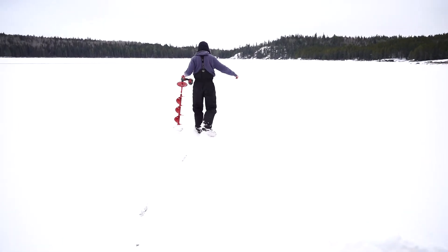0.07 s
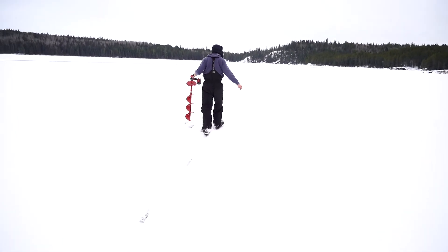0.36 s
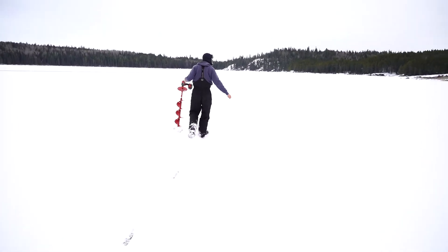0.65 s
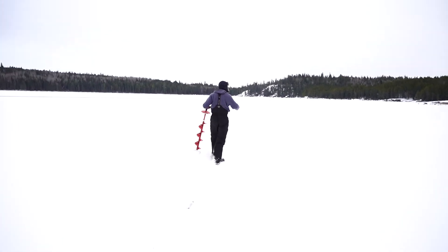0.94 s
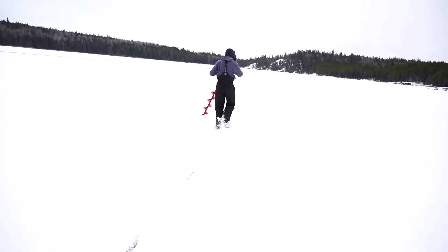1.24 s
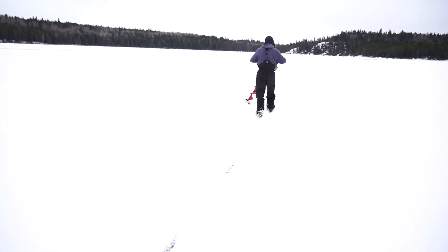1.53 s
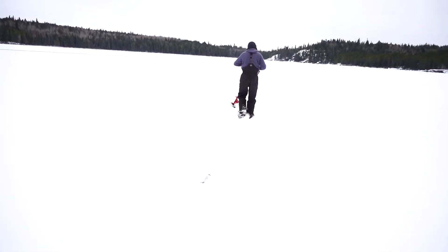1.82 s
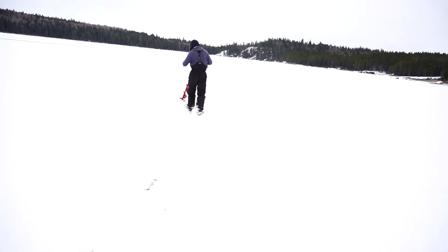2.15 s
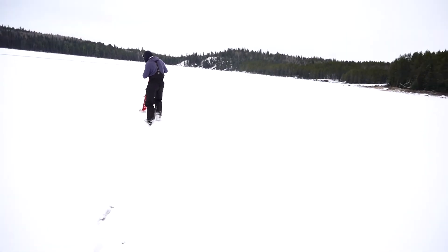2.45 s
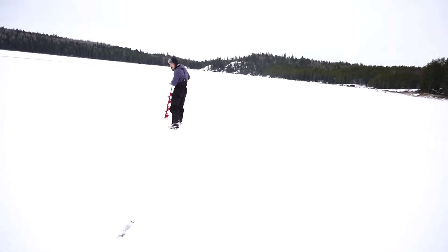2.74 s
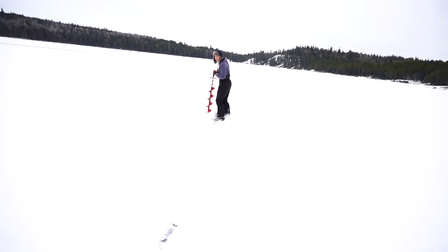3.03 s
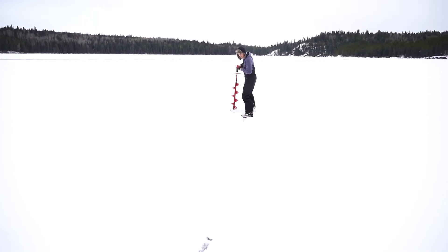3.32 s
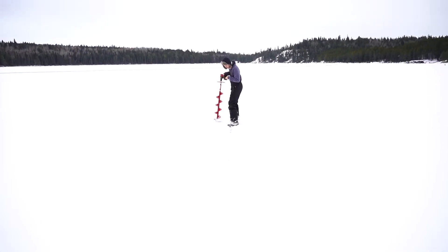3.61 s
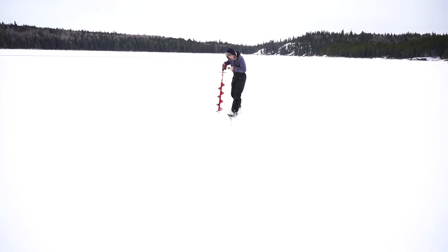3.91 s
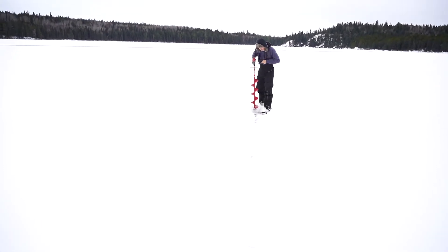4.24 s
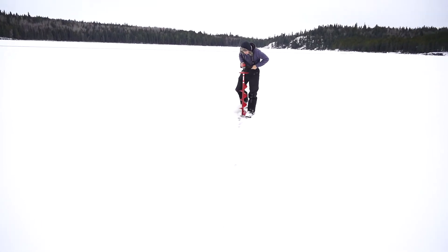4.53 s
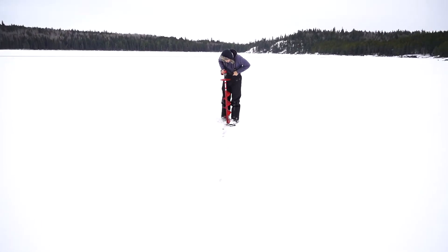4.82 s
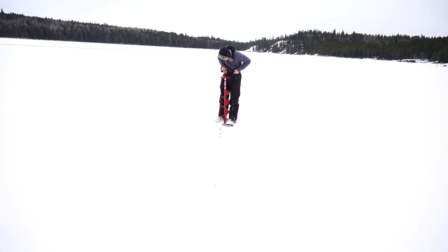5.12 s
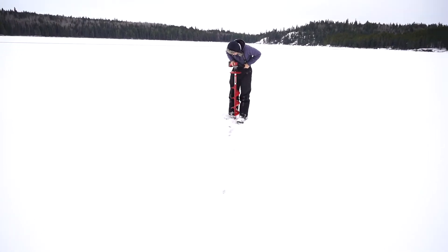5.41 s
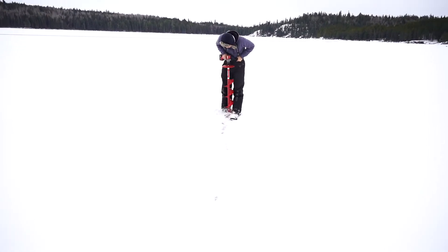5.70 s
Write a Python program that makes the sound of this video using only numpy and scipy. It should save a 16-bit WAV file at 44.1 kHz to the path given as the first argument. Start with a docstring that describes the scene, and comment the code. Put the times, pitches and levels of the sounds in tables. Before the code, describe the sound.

Wind rumbles and thumps unevenly on a hand-held microphone out on an open frozen lake. Under it, winter clothing rustles and swishes, and handled gear gives a few light knocks and clicks. After about five seconds a cordless drill spins up with a thin whistle and a rising gear whine, and its steel auger scrapes and crunches into the ice, harder with each cut. There is no echo.

```python
"""Drilling a frozen lake in the wind

Wind rocks and buffets a hand-held microphone while winter clothing swishes by friction and gear knocks.
Then a cordless drill spins up with a thin switching whistle and the whine of meshing gears.
The blades of its steel auger fracture the ice, scraping harder with each cut."""
import sys
import numpy as np
from scipy import signal
from scipy.fft import rfft, irfft
from scipy.io import wavfile

SR = 44100
rng = np.random.default_rng(int(sys.argv[2]) if len(sys.argv) > 2 else 0)


def dump(signal):
    """Clip the signal to [-1, 1] and save it as 16-bit WAV at the path in sys.argv[1]."""
    limited = np.clip(np.atleast_2d(signal).T, -1, 1)
    pcm = np.round(limited * 32767).astype(np.int16)
    wavfile.write(sys.argv[1], SR, pcm)


N = 262836
TIME = np.arange(N) / SR
FREQ = np.maximum(np.arange(N // 2 + 1) * SR / N, 1)
FULL_DRIVE_HZ = 650  # electrical rate of the motor at full drive

# the trigger, squeezed lightly and then hard: time_s, unloaded_electrical_rate_hz
TRIGGER_SQUEEZE = [(5.122, 1), (5.2, 175), (5.28, 180), (5.39, 335), (5.51, 500), (5.56, 552), (5.87, 610)]
# deep cuts of the blades: peak_s, length_s, level_db, centre_hz, motor_sag_hz
BLADE_CUTS = [(5.416, 0.044, -19.5, 3400, 0), (5.603, 0.064, -17, 1410, 49.5),
              (5.726, 0.023, -15, 1420, 86.5), (5.785, 0.042, -13, 1780, 50.5),
              (5.932, 0.077, -15.5, 1630, 60.5)]


def drill(switching_hz=8000, whistle_db=-39, carrier_db=-9, slot_db=-41, whine_db=-20, rattle_db=-29,
          throb_db=4.5, throb_period_s=0.16, throb_peak_s=5.56):
    """Modulation splits the switching whistle into sidebands; gear teeth whine and rattle the housing."""
    # gear mesh tones: multiple_of_electrical_rate, level_db
    gear_orders = [(3, -12), (5, 0), (6.35, -6)]
    throttle = drive()
    phase = 2 * np.pi * np.cumsum(motor_hz() * (1 + 0.002 * drift(70))) / SR
    ripple = np.sqrt(np.sin(np.pi * throttle))  # strongest at half drive
    whistle = np.sin(2 * np.pi * switching_hz * TIME) * (2 * np.cos(2 * phase) + undb(carrier_db))
    # magnets passing the stator slots buzz as they sweep through a resonance of the case
    buzz = resonate(np.sin(20 * phase) * drift(120), hz=3500, width_hz=400)
    # the whine throbs with the turning auger
    throb = undb(throb_db * np.cos(2 * np.pi * (TIME - throb_peak_s) / throb_period_s) + drift(50))
    whine = sum(undb(db) * np.sin(order * phase) for order, db in gear_orders)
    housing = resonate(grains(1500, 1.5), hz=2900, width_hz=320)
    rattle = unit_rms(resonate(housing, hz=2900, width_hz=960))
    motor = undb(whistle_db) * whistle * ripple + undb(slot_db) * buzz
    gears = undb(whine_db) * whine * throb * throttle ** 2.5 + undb(rattle_db) * rattle * throttle ** 0.55
    return running() * (motor + gears)


def auger(scrape_db=-18, ring_db=-21.5, chips_db=-21, grip_drive=0.59, crunch_width_hz=1500):
    """Brittle fracture of ice under chattering blades excites the steel's modes and throws off chips."""
    # spectrum of the scrape: frequency_hz, level_db
    scrape_spectrum = [(200, -8.5), (300, -7), (440, -4), (600, -6.5), (830, -6), (1000, -0.5),
                       (1400, -4.5), (2200, -6), (3000, -3), (3700, -6.5), (4400, -6), (6000, -21)]
    # modes of the steel flights: pitch_hz, width_hz, level_db
    steel_modes = [(438, 95, 0), (795, 33, 0), (870, 73, -5), (1330, 125, 1), (1687, 52, -0.5),
                   (1806, 20, -3), (2136, 62, -3), (2300, 170, -3.5), (3870, 210, -13)]
    # spectrum of the hissing chips: frequency_hz, level_db
    chip_spectrum = [(3500, -10), (5000, -3), (6200, -6), (7800, -0.5), (8500, -2), (9400, -14),
                     (12500, -12), (15500, -23)]
    depth = (drive() / grip_drive) ** 2.88
    bite = depth / np.hypot(1, depth)  # grows steeply until the blades grip, then levels off
    spray = drive() ** 1.94  # keeps growing with speed
    chatter = undb(drift(51))
    fractures = colour(grains(6000, 1.3) * chatter, scrape_spectrum)
    ring = sum(undb(db) * resonate(grains(3000, 0.93) * chatter, hz, width_hz)
               for hz, width_hz, db in steel_modes)
    scrape = undb(scrape_db) * fractures + undb(ring_db) * unit_rms(ring)
    chips = undb(chips_db) * colour(grains(12000, 0.9) * chatter, chip_spectrum)
    out = running() * (scrape * bite + chips * spray)
    # a blade digging in tears coarser pieces loose
    for peak_s, length_s, db, hz, _ in BLADE_CUTS:
        pieces = grains(2500, 1.8) * chatter
        crunch = resonate(resonate(pieces, hz, crunch_width_hz), hz, crunch_width_hz)
        out += undb(db) * swell(peak_s, length_s) * unit_rms(crunch)
    return out


def drive():
    """Duty cycle: the share of full drive that the trigger gives the motor, 0-1."""
    return curves(TRIGGER_SQUEEZE)[0] / FULL_DRIVE_HZ


def running(attack_s=0.027):
    """Onset ramp from zero to one as the trigger closes."""
    return np.clip((TIME - TRIGGER_SQUEEZE[0][0]) / attack_s, 0, 1)


def motor_hz(sag_s=0.08, lag_s=0.006):
    """Load torque pulls the motor's electrical rate below its unloaded value at each deep cut."""
    sag = sum(sag_hz * swell(peak_s + lag_s, sag_s) for peak_s, _, _, _, sag_hz in BLADE_CUTS)
    return FULL_DRIVE_HZ * drive() - sag


def wind(sway_hz=14.2, wander=0.1256, overtone_db=-18, rumble_boost_db=6, breeze_db=-35, patchy_db=5):
    """Flow rocks the microphone on its mount; turbulent pressure rumbles and flutters in quick puffs."""
    # strength of the wind at the microphone: time_s, sway_db, buffet_db
    gusts = [(0.0, -19, -44), (0.3, -9.5, -38), (0.58, -18.0, -38), (0.92, -9, -31), (1.04, -22, -34),
             (1.25, -3.5, -25.5), (1.5, -6, -28.5), (1.85, -3.5, -28), (2.15, -11.5, -33.5),
             (2.55, -10.5, -29.5), (2.95, -7, -33), (3.5, -11.5, -42.5), (4.25, -7.5, -35.5),
             (4.47, -14, -53), (4.95, -12, -39.5), (5.27, -7.5, -34.5), (5.72, -23, -40),
             (5.96, -17, -39.5)]
    # spectrum of the buffeting: frequency_hz, level_db
    buffet_spectrum = [(14, -27), (24, -20), (35, 7), (48, -5.5), (60, -9), (82, -3), (105, -12.5),
                       (150, -22.5), (300, -21.5)]
    # spectrum of the flutter: frequency_hz, level_db
    flutter_spectrum = [(70, 7.5), (130, -1.5), (190, -0.5), (290, -1), (450, -6), (700, -10.5),
                        (1200, -15.5), (2500, -53), (8000, -34)]
    sway_db, buffet_db = curves(gusts)
    flutter_db = -38 + 0.23 * (buffet_db - breeze_db)  # grows more slowly than the buffeting
    phase = 2 * np.pi * np.cumsum(sway_hz * (1 + wander * drift(5.83))) / SR
    rocking = unit_rms(np.sin(phase) + undb(overtone_db) * np.sin(2 * phase))  # a lopsided swing
    rumble = colour(noise(), buffet_spectrum) * undb(buffet_db + rumble_boost_db)
    puffs = noise() * undb(patchy_db * np.clip(drift(33.5), -2, 2))
    flutter = colour(puffs, flutter_spectrum) * undb(flutter_db)
    return rocking * undb(sway_db) + (rumble + flutter) * undb(lulls_db())


def lulls_db():
    """Turbulent noise falls in level while the wind briefly drops."""
    # lulls in the wind: centre_s, length_s, depth_db
    lulls = [(1.736, 0.023, -15), (2.158, 0.048, -5), (2.26, 0.03, -5), (2.629, 0.039, -15),
             (3.347, 0.048, -6.5), (4.493, 0.042, -11), (5.097, 0.037, -1.5)]
    return sum(db * swell(centre_s, length_s) for centre_s, length_s, db in lulls)


def eddies(width_share=0.44):
    """The pressure pulse of a single eddy meets the microphone as a short, dull thump."""
    # passing eddies: peak_s, length_s, level_db, centre_hz
    pulses = [(0.307, 0.099, -13.5, 37.3), (0.446, 0.0092, -30, 264), (0.73, 0.016, -27.5, 280),
              (0.919, 0.027, -29.5, 320), (0.935, 0.065, -29, 98), (1.141, 0.038, -25, 294),
              (1.323, 0.027, -26.5, 261), (1.38, 0.071, -18.5, 39.5), (1.39, 0.0059, -18, 295),
              (1.494, 0.05, -37, 304), (1.54, 0.06, -16.5, 69.7), (1.755, 0.057, -13, 39.1),
              (2.032, 0.016, -21.5, 128), (2.066, 0.017, -26, 295), (2.217, 0.028, -31, 296),
              (2.32, 0.04, -29.5, 86), (2.581, 0.024, -22.5, 88.5), (2.758, 0.015, -27, 312),
              (2.844, 0.035, -15, 79), (3.964, 0.033, -20, 32.6), (5.33, 0.031, -24.5, 91)]
    out = np.zeros(N)
    for peak_s, length_s, db, hz in pulses:
        envelope = swell(peak_s, length_s)
        thump = envelope * resonate(resonate(noise(), hz, hz * width_share), hz, hz * width_share)
        out += undb(db) * thump * np.sqrt(np.sum(envelope ** 2) / np.sum(thump ** 2))
    return out


def knocks(width_share=0.98, crumble=0.92):
    """Impact on handled gear: an impulse and a short crumbling tail excite a damped resonance."""
    # knocks and clicks: start_s, peak_db, centre_hz, t60_s
    contacts = [(0.275, -23.5, 469, 0.029), (0.508, -11, 470, 0.015), (.510, -10, 269, 0.018),
                (.828, -27, 4000, .008), (0.837, -29, 5000, .005), (1.467, -32, 6900, 0.0045),
                (2.068, -27, 4500, .006), (2.178, -27.5, 4050, .006), (3.247, -27.5, 790, 0.016),
                (4.122, -36, 1090, 0.014), (4.137, -39, 1100, 0.022), (4.542, -21, 830, 0.036),
                (4.552, -27, 2500, 0.03), (5.023, -28, 520, 0.017), (5.171, -18.5, 3430, 0.015),
                (5.173, -24.5, 730, 0.022)]
    out = np.zeros(N)
    for start_s, db, hz, t60_s in contacts:
        age = np.maximum(TIME - start_s, 0)
        force = crumble * noise() * (TIME >= start_s) * np.exp(-np.log(1000) * age / t60_s)
        force[int(start_s * SR)] += 4
        # a small object radiates no bass and a soft contact no treble
        band = signal.butter(2, [hz / 2, min(2 * hz, SR / 3)], "band", fs=SR, output="sos")
        ring = signal.sosfilt(band, resonate(force, hz, hz * width_share))
        out += undb(db) * ring / np.abs(ring).max()
    return out


def clothing(rustle_db=-46, stir_db=-8, patchy_db=2):
    """Friction of threads slipping over each other makes a gritty rustle and dull or crisp swishes."""
    # spectrum of the soft rustle: frequency_hz, level_db
    rustle_spectrum = [(350, -1.5), (600, -1.5), (866, -2.5), (940, -3), (1080, -5.5), (1300, -5),
                       (1880, -7.5), (3030, -12), (6670, -17.5), (13300, -30), (15500, -30)]
    # spectrum of a dull stroke: frequency_hz, level_db
    dull_spectrum = [(410, -26), (700, -12), (1220, -0.5), (1390, 1.5), (2280, -2), (2950, -2), (3970, -5),
                     (4300, -3.5), (5710, -13.5), (8210, -12), (10100, -34), (13100, -18), (15500, -42)]
    # spectrum of a crisp stroke: frequency_hz, level_db
    crisp_spectrum = [(2000, -11), (5500, -4), (8000, 1), (9500, -10), (13000, -8), (15500, -19)]
    # strokes of nylon on nylon and snow: peak_s, length_s, level_db, crisp_share
    strokes = [(0.374, 0.05, -46.5, 0.12), (0.498, 0.11, -46.5, 0.13), (0.633, 0.067, -51.5, 0.3),
               (0.715, 0.039, -42, 0.7), (0.79, 0.033, -36.5, 0.2), (0.954, 0.1, -44, 0.63),
               (1.12, 0.13, -48.5, 0.65), (1.306, 0.036, -25, 0.13), (1.377, 0.053, -42.5, 0.2),
               (1.561, 0.024, -44, 0.1), (1.809, 0.012, -42, 0.8), (1.94, 0.11, -54, 0),
               (2.095, 0.16, -48, 1), (2.44, 0.18, -55.5, 1), (2.92, 0.075, -44, 0.05),
               (3.038, 0.055, -37, 0.26), (3.412, 0.063, -49, 0), (3.682, 0.13, -41, 0),
               (3.792, 0.11, -36.5, 0.15), (3.948, 0.067, -50, 0.4), (4.74, 0.1, -47, 0.01)]
    rustle = colour(noise() + 0.37 * grains(1500, 3.1), rustle_spectrum) * undb(patchy_db * drift(22))
    dull = colour(grains(14000, 2.8), dull_spectrum)
    crisp = colour(grains(8000, 1.8), crisp_spectrum)
    out = undb(rustle_db + lulls_db() / 2) * rustle  # the wind stirs the cloth too
    for peak_s, length_s, db, crisp_share in strokes:
        swish = np.sqrt(1 - crisp_share) * dull + np.sqrt(crisp_share) * crisp + undb(stir_db) * rustle
        out += undb(db) * swell(peak_s, length_s) * swish
    return out


def undb(db):
    """Decibels to amplitude gain."""
    return 10 ** (np.asarray(db) / 20)


def unit_rms(x):
    """Normalisation to an rms of one."""
    return x / np.sqrt(np.mean(x ** 2))


def curves(table):
    """Linear interpolation of each column over the times in the first, one value a sample."""
    times_s, *columns = np.transpose(table)
    return [np.interp(TIME, times_s, column) for column in columns]


def noise():
    """Gaussian white noise."""
    return rng.standard_normal(N)


def drift(cutoff_hz):
    """Low-passed noise: a smooth random fluctuation with an rms of one."""
    return unit_rms(irfft(rfft(noise()) / (1 + (FREQ / cutoff_hz) ** 4), N))


def colour(x, spectrum):
    """Spectral shaping by (frequency_hz, level_db) points, falling away beyond the ends; rms of one."""
    hz, db = np.transpose(spectrum)
    gain = undb(np.interp(np.log(FREQ), np.log(hz), db))
    skirts = np.minimum(FREQ / hz[0], 1) ** 3 * np.minimum(hz[-1] / FREQ, 1) ** 3
    return unit_rms(irfft(rfft(x) * gain * skirts, N))


def resonate(x, hz, width_hz):
    """A two-pole resonance with gain one at its centre."""
    return signal.lfilter(*signal.iirpeak(min(hz, SR / 3), hz / min(width_hz, SR / 4), SR), x)


def grains(per_second, spread_db):
    """A Poisson process of tiny clicks, a few much larger than the rest."""
    clicks = (rng.random(N) < per_second / SR) * noise()
    return unit_rms(clicks * undb(spread_db * np.minimum(rng.exponential(size=N), 4)))


def swell(peak_s, length_s):
    """A Gaussian rise and fall."""
    return np.exp(-2 * ((TIME - peak_s) / length_s) ** 2)


def scene():
    """Superposition in a free field: open snow gives no echo."""
    return (wind() + eddies() + clothing() + knocks() + drill() + auger())[None]


def record(dry, cutoff_hz=15600):
    """Saturation on the largest wind swings chokes the hiss riding on them; a low-pass cuts the top."""
    saturated = dry / (1 + dry ** 8) ** (1 / 8)
    return signal.sosfilt(signal.ellip(10, 0.2, 80, cutoff_hz, fs=SR, output="sos"), saturated)


dry = scene()
out = record(dry)
dump(out)
```